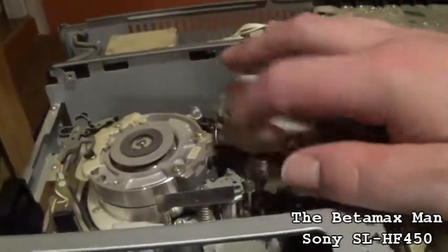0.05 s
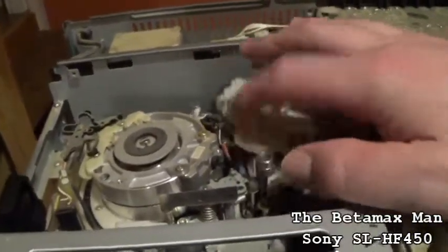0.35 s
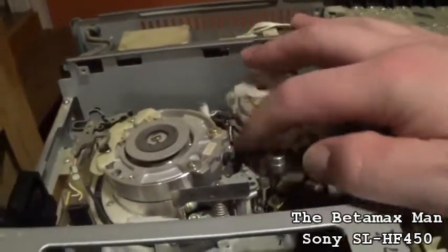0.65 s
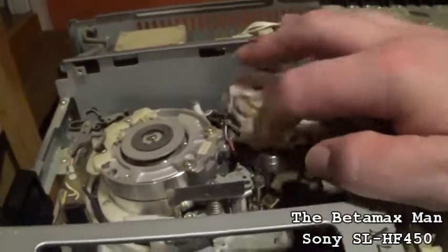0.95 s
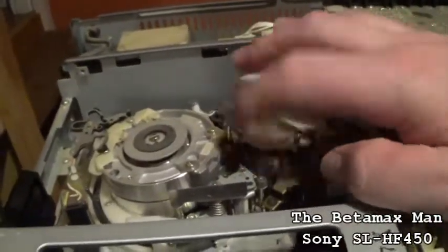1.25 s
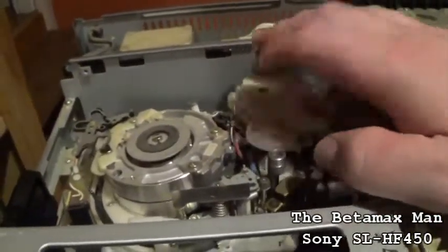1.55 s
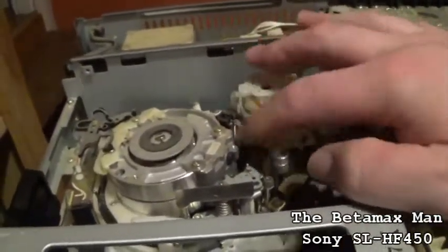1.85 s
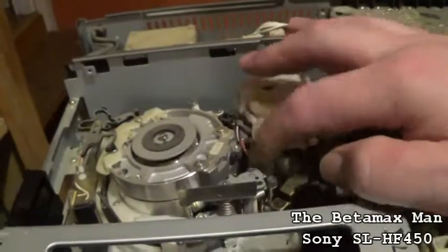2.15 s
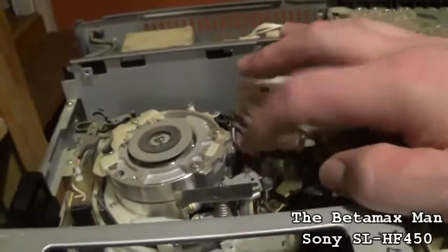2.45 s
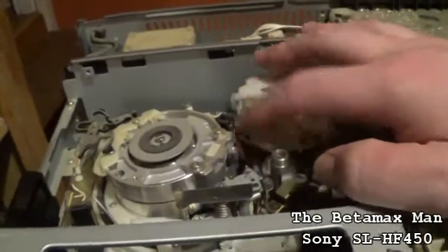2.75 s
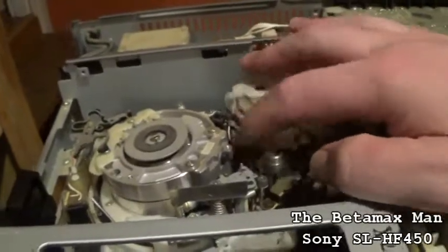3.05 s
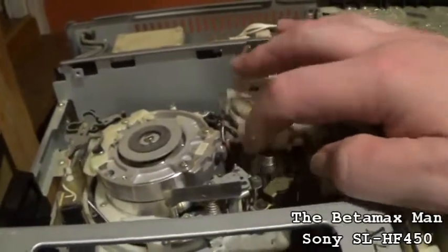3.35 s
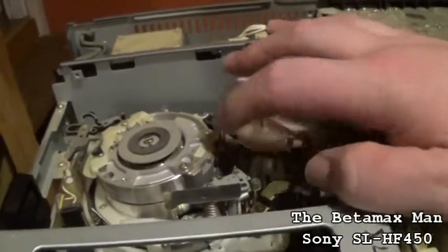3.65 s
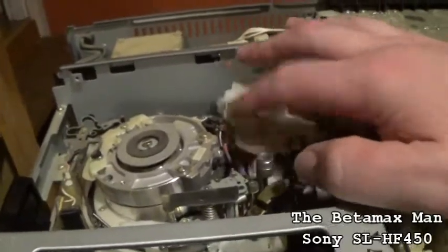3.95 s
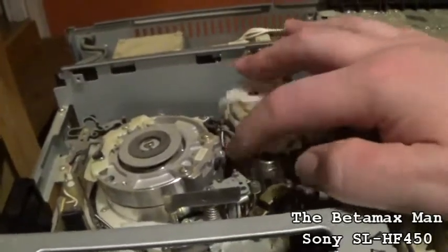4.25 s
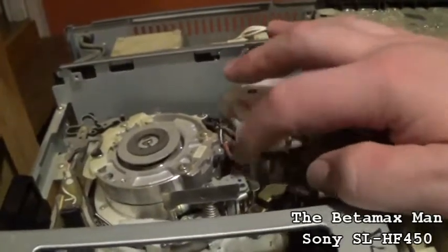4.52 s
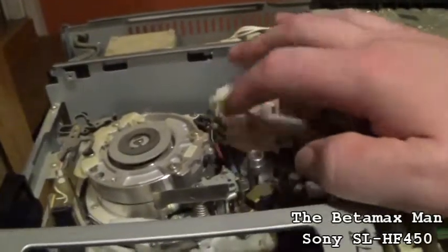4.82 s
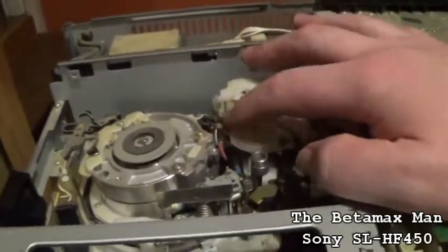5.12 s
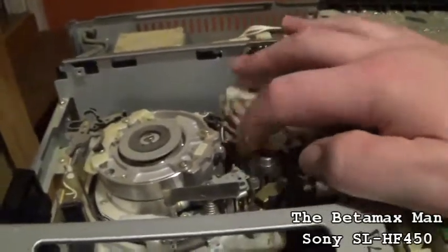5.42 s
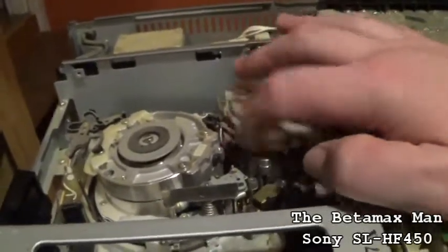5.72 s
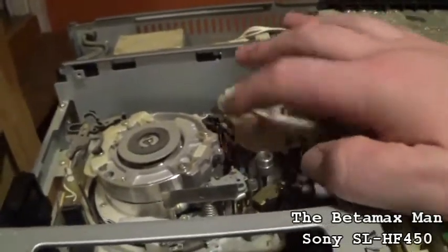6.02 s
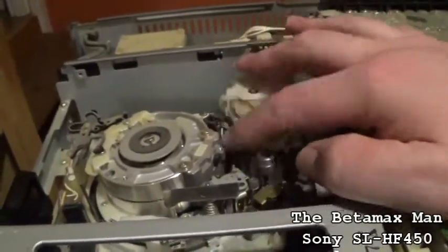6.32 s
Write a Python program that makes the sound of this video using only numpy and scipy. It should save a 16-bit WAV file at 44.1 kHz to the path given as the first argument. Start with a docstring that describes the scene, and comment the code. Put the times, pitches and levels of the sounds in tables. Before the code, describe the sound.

Close, uneven clicking and brief rasping of plastic gear teeth pushed by hand, over light ticks and dull knocks in a quiet room.

```python
"""Close microphone on an open tape machine in a small, quiet room. From the start a finger turns the
small plastic gears, push after push: the teeth drag, the hand knocks the hollow chassis, a light pawl
ticks at uneven steps, and teeth snap and rasp as each push takes hold. Just before one second a small
metal part rings on, once. Dull taps and soft thuds join in, the fingertip squeaks about halfway,
and the sharpest snap comes a little after five seconds."""
import sys
import numpy as np
from scipy import signal
from scipy.fft import rfft, irfft, next_fast_len
from scipy.io import wavfile

SR = 44100
rng = np.random.default_rng(int(sys.argv[2]) if len(sys.argv) > 2 else 0)


def generate_wav(signal):
    """Clip the signal to [-1, 1] and save it as 16-bit WAV at the path in sys.argv[1]."""
    frames = np.transpose(np.atleast_2d(signal))
    scaled = np.clip(frames, -1, 1) * 32767
    pcm = np.round(scaled).astype(np.int16)
    wavfile.write(sys.argv[1], SR, pcm)


N = 290261
TIME = np.arange(N) / SR
TOOTH_HZ = 8570  # the teeth ring near this pitch
# resonances of a plastic wheel: pitch_hz, width_hz, level_db
WHEEL_MODES = [(3100, 290, -4), (3730, 1130, -2), (4880, 1970, 1.5), (6290, 230, 0.5), (7220, 710, -2.5)]
# resonances of the frame that holds the wheels: pitch_hz, width_hz, level_db
FRAME_MODES = [(794, 780, -10), (940, 230, -4.5), (1255, 112, 4), (1664, 260, -1.5), (2170, 640, 0)]


def undb(db):
    """Decibels to gain."""
    return 10 ** (np.asarray(db) / 20)


def unit(x):
    """Scale to rms 1."""
    return x / np.sqrt(np.mean(x ** 2))


def burst(x, seconds):
    """Scale a short sound to the energy of rms 1 held for that long."""
    return x * np.sqrt(seconds * SR / np.sum(x ** 2))


def add(out, start_s, x):
    """Mix x into out from start_s on."""
    i = max(int(start_s * SR), 0)
    out[i:i + len(x)] += x[:max(N - i, 0)]


def colour(x, points):
    """Filter by a curve through points of frequency_hz, gain_db."""
    hz, db = np.transpose(points)
    size = next_fast_len(len(x) + 2048)
    bins_hz = np.maximum(np.fft.rfftfreq(size, 1 / SR), 1)
    gain = undb(np.interp(np.log(bins_hz), np.log(hz), db))
    return irfft(rfft(x, size) * gain, size)[:len(x)]


def walk(rate_hz):
    """A random value that wanders about rate_hz times a second."""
    return np.interp(TIME * rate_hz, np.arange(4096), rng.standard_normal(4096))


def contact(length_s, chatter):
    """One blow followed by a brief chatter of the two surfaces."""
    count = max(int(length_s * SR), 8)
    force = chatter * rng.standard_normal(count) * np.sqrt(np.linspace(2, 0, count) / count)
    force[0] += 1
    return force


def ring(force, modes, detune=0., scatter_db=0., rise_s=.0001, size=768):
    """Drive damped resonances that build up briefly; the point of contact shifts pitch and balance."""
    hz, width, db = np.transpose(modes)[:, :, None]
    t = np.arange(size) / SR
    shift, weight, phase = rng.standard_normal((3, len(modes), 1))
    swing = np.sin(2 * np.pi * (hz * (1 + detune * shift) * t + phase))
    partials = width * undb(db + scatter_db * weight) * np.exp(-np.pi * width * t) * swing
    return np.convolve(force, partials.sum(0) * (1 - np.exp(-t / rise_s)))


def tooth(hz):
    """The modes of a gear tooth of that pitch."""
    # tooth resonances: pitch_ratio, width_hz, level_db
    modes = [(.83, 543, -1), (0.999, 380, 11), (1.07, 453, -2.5), (1.2, 895, -1.5)]
    return [(hz * ratio, width, db) for ratio, width, db in modes]


def pressure_db(release_db=20.5, rest_db=-68):
    """Each push of the finger swells and lets go, evenly in dB; in between it rests on the wheel."""
    # pushes and lighter touches: peak_s, level_db, rise_s, fall_s (each slope spans release_db)
    pushes = [(.005, -46, .05, .08), (.385, -44, .09, .08), (0.757, -36, .055, .08), (1.01, -51, .12, .06),
              (1.175, -42, .11, .065), (1.515, -40, .11, .1), (1.595, -49, .04, 0.056), (1.79, -60, .2, .1),
              (1.932, -37, .06, .08), (2.195, -51, .09, .07), (2.308, -53, .012, .025),
              (2.376, -44, .015, .11), (2.745, -48, .03, .08), (2.8, -42, .07, .065),
              (3.175, -52, .09, .07), (3.241, -49, .04, .09), (3.55, -40, .075, .14), (3.93, -39, .06, .08),
              (4.178, -51, .015, .05), (4.365, -38, .055, .09), (4.49, -59, .08, .25),
              (4.795, -38.5, .085, .065), (5.015, -55, .06, .05), (5.168, -38.5, .05, .085),
              (5.562, -41, .085, .05), (5.655, -44, .06, .09), (5.799, -52, .07, .13),
              (5.955, -45, .08, .05), (6.062, -51, .03, .04), (6.335, -42, .06, .065),
              (6.435, -47, .06, .09)]
    power = undb(rest_db) ** 2
    for peak_s, db, rise_s, fall_s in pushes:
        away = np.maximum((peak_s - TIME) / rise_s, (TIME - peak_s) / fall_s)
        power = power + undb(db - release_db * away) ** 2
    return 10 * np.log10(power)


def moments(count, crowding):
    """Random times that crowd together where the finger presses harder."""
    chance = np.cumsum(undb(crowding * pressure_db()))
    return np.interp(rng.random(count), chance / chance[-1], TIME)


def slips(rate_hz, spread_db):
    """Stick-slip: tiny impulses at random moments, a few much larger than the rest."""
    when, size, sign = rng.random((3, N))
    strength = undb(spread_db * np.minimum(-np.log(1 - size), 4))
    return (when < rate_hz / SR) * strength * np.sign(sign - .5)


def room_tone(level_db=-59.5, side_db=-14, hum_hz=59.6, hum_db=-73, waver_db=3.0):
    """Steady room noise, nearly the same on both sides, with a faint hum that wavers."""
    # spectrum of the quiet room: frequency_hz, gain_db
    spectrum = [(20, -4), (60, 2), (130, 6), (280, 7.5), (500, 1), (1000, -14), (2000, -12), (4000, -8.5),
                (8500, -13.5), (11000, -35)]
    mid = unit(colour(rng.standard_normal(N), spectrum))
    side = colour(rng.standard_normal(N), spectrum)
    side = unit(colour(side, [(250, -26), (600, -18)]))
    hum = undb(hum_db + waver_db * walk(4.6)) * unit(np.sin(2 * np.pi * hum_hz * TIME))
    return undb(level_db) * (mid + undb(side_db) * side * np.array([[1], [-1]])) + hum


def drag(flutter_db=2.9, shimmer_db=3, ring_db=-5, ring_q=14, hiss_db=-0.5):
    """Plastic slides in dense slips that hiss, rumble in the frame and keep the teeth faintly ringing."""
    # friction hiss at the teeth: frequency_hz, gain_db
    hiss_spectrum = [(1800, -28), (2900, -4.5), (4000, 1), (4700, 0), (5900, -1.5), (6500, -2), (7100, 7),
                     (7700, -2), (8600, -1), (9200, -4), (9800, 0.5), (11000, -3)]
    # friction carried through the frame: frequency_hz, gain_db
    frame_spectrum = [(50, -14.5), (140, 2), (350, 0), (650, -3.5), (900, -1), (1350, -6), (1800, -6),
                      (2400, -8.5), (3000, -15), (4500, -56)]
    # rings that sliding keeps alive: pitch_hz, level_db
    slide_rings = [(3900, -10), (5600, -5), (8500, 1.5), (9050, -1)]
    pressure = pressure_db()
    friction = slips(rate_hz=9000, spread_db=3.6) * undb(flutter_db * walk(110))
    teeth = unit(colour(friction, hiss_spectrum))
    for hz, db in slide_rings:
        band = signal.lfilter(*signal.iirpeak(hz, ring_q, SR), friction)
        # each ring comes and goes as the contact moves round the wheel
        teeth = teeth + undb(ring_db + db) * unit(band * walk(30) * undb(shimmer_db * walk(10)))
    frame = unit(colour(friction, frame_spectrum))
    # the frame answers more evenly than the teeth; a normal push is -41.5 dB
    frame_db = -47 + 0.55 * (pressure + 41.5)
    return unit(teeth) * undb(pressure + hiss_db) + frame * undb(frame_db)


def knocks(rap_gain_db=1.0, clatter_db=-8, clatter_t60_s=0.1):
    """The hollow chassis booms under a soft bump and raps under a harder one; loose parts clatter."""
    # bumps on the chassis: start_s, boom_db, rap_db
    bumps = [(0.037, -43, -43.5), (.13, -50, -66), (.284, -41, -54), (1.012, -52.5, -56), (1.467, -45, -68),
             (2.134, -58, -51), (2.204, -48.5, -52.5), (2.48, -51, -57), (3.388, -55.5, -59),
             (3.867, -38, -52.5), (3.965, -51, -62), (4.565, -53, -50), (5.083, -37, -51),
             (5.266, -49.5, -55), (5.583, -33, -41.5), (5.792, -54, -50), (6.11, -50.5, -46.5),
             (6.207, -49, -55), (6.331, -34.5, -52), (6.353, -50, -55)]
    # low chassis resonances: pitch_hz, width_hz, level_db
    boom_modes = [(143, 40, -4.5), (254.5, 26, -9.5), (358.7, 16.4, 5.5), (421, 25, -2.5), (573, 26, -8.5)]
    # higher chassis resonances: pitch_hz, width_hz, level_db
    rap_modes = [(600, 32, -6.5), (820, 59, 3.5), (870, 64, 7.5), (1215, 41, -6.5), (1392, 36, -9),
                 (1800, 90, -11)]
    out, t = np.zeros(N), TIME[:SR // 6]
    envelope = undb(-60 * t / clatter_t60_s) * np.minimum(t / 0.00092, 1)
    for start_s, boom_db, rap_db in bumps:
        for modes, db in (boom_modes, boom_db), (rap_modes, rap_db + rap_gain_db):
            force = contact(0.0038, chatter=0.24)
            chassis = ring(force, modes, detune=0.025, scatter_db=0.5, rise_s=0.002, size=6144)
            low, high = modes[0][0], modes[-1][0]
            band = [(low / 2, -20), (low, 0), (high, 0), (2 * high, -22), (4 * high, -50)]
            clatter = colour(rng.standard_normal(len(t)), band) * envelope
            add(out, start_s, burst(chassis, 0.013) * undb(db))
            add(out, start_s, burst(clatter, 0.014) * undb(db + clatter_db))
    return out


def pawl(level_db=-53, spread_db=0.85, bounce_s=.0019, bounce=0.91, click_db=-10):
    """A sprung pawl drops with a light tick and a quick bounce; the wheel under it gives a dull click."""
    # drops that stand clear in the lulls: start_s
    drops = [.057, .096, .212, .328, .511, 0.884, .973, 1.023, 1.267, 1.33, 1.402, 1.428, 1.655, 1.738,
             1.759, 2.077, 2.156, 2.302, 2.545, 2.925, 3.015, 3.146, 3.263, 3.384, 3.419, 3.680, 3.802,
             3.874, 4.059, 4.106, 4.327, 4.506, 4.618, 4.749, 4.886, 5.011, 5.088, 5.125, 5.289, 5.377,
             5.413, 5.648, 5.685, 5.754, 5.812, 5.841, 6.054, 6.181, 6.202, 6.221, 6.250, 6.377, 6.398,
             6.572]
    # pawl resonances: pitch_hz, width_hz, level_db
    modes = [(2112, 62, -1), (2230, 150, -13), (3340, 69, -16.5), (4140, 130, -20), (5970, 330, -12),
             (6300, 61, -12), (7300, 220, -20.5), (7940, 240, -16), (8500, 220, -19), (9100, 200, -26),
             (10020, 110, -18)]
    out = np.zeros(N)
    for start_s in np.concatenate([drops, moments(count=10, crowding=1.3)]):
        db = level_db + spread_db * rng.standard_normal()
        for delay_s, share in (0, 1), (bounce_s * rng.uniform(0.695, 1.3), bounce):
            tick = ring(contact(0.0011, chatter=0.45), modes, detune=0.013, scatter_db=0.2, size=1024)
            click = ring(contact(0.0013, chatter=1.1), WHEEL_MODES + FRAME_MODES, detune=0.064)
            add(out, start_s + delay_s, share * burst(tick, 0.011) * undb(db))
            add(out, start_s + delay_s, share * burst(click, 0.0064) * undb(db + click_db))
    return out


def catches(count=110, crowding=1.1, level_db=-46, spread_db=3):
    """Teeth catch lightly and crackle at random, mostly while the finger pushes."""
    out, modes = np.zeros(N), WHEEL_MODES + tooth(TOOTH_HZ)
    for start_s, size in zip(moments(count, crowding), rng.standard_normal(count)):
        click = ring(contact(0.0015, chatter=1.7), modes, detune=0.056, scatter_db=2.5)
        add(out, start_s, burst(click, 0.002) * undb(level_db + spread_db * min(size, 2)))
    return out


def backlash(count=65, level_db=-56, spread_db=3):
    """Loose wheels tick faintly against each other at any moment."""
    out, modes = np.zeros(N), WHEEL_MODES + tooth(hz=8700)
    for start_s, size in zip(rng.uniform(0, N / SR, count), rng.standard_normal(count)):
        tick = ring(contact(0.0013, chatter=0.31), modes, detune=0.1, scatter_db=-5)
        add(out, start_s, burst(tick, 0.0028) * undb(level_db + spread_db * min(size, 2)))
    return out


def snaps(tooth_scatter=0.013, lead_width_hz=340, lead_db=6, frame_gain_db=-1):
    """A tooth springs free and rings high, one mode of its wheel leads the crack, the frame clacks."""
    # the loudest teeth snapping free: start_s, tooth_db, wheel_db, lead_hz, frame_db
    releases = [(.246, -49.5, -35, 3570, -43), (0.2572, -41, -49, 4030, -50),
                (.3593, -50, -36.5, 4530, -62), (0.3672, -31.5, -46, 4130, -53),
                (0.407, -37, -37, 6870, -45), (0.6474, -43.5, -54, 7300, -56),
                (0.7493, -31, -38, 7000, -59), (.757, -33, -37, 3200, -50),
                (0.8672, -70, -39.5, 3000, -42.5), (1.1589, -32, -33, 2960, -48),
                (1.1625, -31, -36, 6900, -53), (1.1796, -26.5, -30.5, 6215, -41),
                (1.251, -31.5, -35, 4860, -67), (1.407, -45, -39.5, 7040, -44),
                (1.4547, -54, -39.5, 3840, -45), (1.501, -33, -36, 6050, -49),
                (1.582, -29, -34.5, 5040, -49), (1.9332, -35, -33, 6940, -54),
                (2.3868, -34.5, -40, 7060, -61), (2.4421, -36, -47, 5070, -69),
                (2.7906, -33, -35.5, 5600, -40), (2.8025, -27, -44, 3870, -47),
                (3.0312, -38.5, -44, 6908, -46.5), (3.09, -47, -43, 5424, -48),
                (3.1743, -35.5, -51, 6014, -48), (3.247, -38, -34.5, 5750, -68),
                (3.454, -58, -45, 3100, -44), (3.4643, -35, -52, 7160, -65), (3.489, -57, -44, 3001, -41),
                (3.549, -27, -27.5, 5440, -38), (3.8359, -38.5, -45, 6147, -43.5),
                (4.005, -38.5, -36.5, 6760, -49), (4.012, -47, -38.5, 5000, -46),
                (4.0474, -48, -37.5, 2880, -39), (4.1735, -66, -34.5, 3603, -58),
                (4.3659, -23.5, -36, 7118, -39.5), (4.411, -39, -40.5, 6204, -62),
                (4.6672, -42, -43.5, 4543, -45), (4.7926, -31, -30, 6242, -42),
                (4.7981, -23, -26, 7005, -40), (4.8224, -35, -31.5, 6910, -55),
                (5.026, -35, -45, 6720, -70), (5.138, -59, -38.5, 4534, -56), (5.15, -47, -37.5, 5480, -64),
                (5.166, -26, -41, 5506, -38), (5.1717, -17.5, -38, 6960, -42),
                (5.4508, -42.5, -50, 4650, -54), (5.4905, -58, -40.5, 3070, -43),
                (5.547, -27.5, -42, 6815, -59), (5.5681, -38, -36, 4903, -39),
                (5.6734, -46, -41.5, 5070, -53), (5.8584, -33, -35, 4288, -44.5),
                (5.953, -33, -42, 7045, -41), (6.258, -38, -48, 4105, -52), (6.33, -33.5, -50, 4106, -50),
                (6.349, -53, -34, 3980, -53), (6.4898, -48, -32, 3270, -40)]
    out = np.zeros(N)
    for start_s, tooth_db, wheel_db, lead_hz, frame_db in releases:
        force = contact(0.00227, chatter=1.46)
        tip = tooth(TOOTH_HZ * (1 + tooth_scatter * rng.standard_normal()))
        wheel = WHEEL_MODES + [(lead_hz, lead_width_hz, lead_db)]
        for modes, db in (tip, tooth_db), (wheel, wheel_db), (FRAME_MODES, frame_db + frame_gain_db):
            part = ring(force, modes, detune=0.014, scatter_db=1.5, rise_s=0.00022)
            add(out, start_s, burst(part, 0.0022) * undb(db))
    return out


def rasps(teeth_per_s=230, slip_s=.0035, spread_db=2.5, frame_gain_db=-1):
    """A push gives way: several teeth skip past each other in a swelling run, each with its own ring."""
    # bell-shaped runs of slipping teeth: middle_s, half_width_s, teeth_db, frame_db
    runs = [(.377, .016, -40, -44.5), (0.762, 0.013, -35, -40), (1.003, 0.0091, -49, -48),
            (1.187, 0.0084, -40, -46), (1.503, 0.0074, -34, -46), (1.517, 0.0048, -38, -39.5),
            (1.583, 0.0078, -39, -49), (1.915, .005, -39.5, -42), (1.945, 0.013, -40.5, -48.5),
            (2.174, .013, -53.5, -50), (2.202, 0.0085, -48.5, -49.5), (2.372, 0.0046, -35, -45.5),
            (2.796, .011, -40, -41.5), (3.172, .008, -47, -53), (3.381, .0064, -46, -50),
            (3.552, .005, -34.5, -40.5), (3.917, .004, -33, -41), (3.934, 0.0072, -32, -41.5),
            (4.173, .005, -53.5, -42.5), (4.356, .01, -38, -45.5), (4.775, 0.0051, -38.5, -39),
            (4.794, .008, -32.5, -38), (5.169, 0.0068, -34, -41.5), (5.559, 0.0077, -33, -39),
            (5.953, 0.0075, -41, -50.5), (6.333, 0.0041, -43, -45), (6.353, 0.0052, -44, -40),
            (6.437, 0.0081, -46, -53)]
    out = np.zeros(N)
    for middle_s, half_width_s, teeth_db, frame_db in runs:
        reach_s = 2 * half_width_s
        teeth, frame = np.zeros((2, SR // 4))
        for offset_s in np.arange(-reach_s, reach_s, 1 / teeth_per_s):
            swell = np.exp(-.5 * (offset_s / half_width_s) ** 2)
            force = contact(slip_s, chatter=2.4) * swell * undb(spread_db * rng.standard_normal())
            at_s = offset_s + reach_s + rng.uniform(0, .5) / teeth_per_s
            add(teeth, at_s, ring(force, WHEEL_MODES + tooth(TOOTH_HZ), detune=0.06, scatter_db=4))
            add(frame, at_s, ring(force, FRAME_MODES, detune=0.064, scatter_db=1.5))
        start_s = middle_s - reach_s - slip_s / 2
        add(out, start_s, burst(teeth, reach_s) * undb(teeth_db))
        add(out, start_s, burst(frame, reach_s) * undb(frame_db + frame_gain_db))
    return out


def ping(start_s=.778, level_db=-48):
    """A small metal part is set ringing; a close pair of modes beats as it dies away."""
    # modes of the metal part: pitch_hz, t60_s, level_db
    modes = [(4480, 0.58, -1.5), (4520, 0.6, -.5), (6384, 0.6, -13), (6500, 0.69, -8), (6900, 0.37, -14),
             (10770, 0.49, -4)]
    out, t = np.zeros(N), TIME[:SR]
    metal = sum(undb(db - 60 * t / t60_s) * np.sin(2 * np.pi * hz * t) for hz, t60_s, db in modes)
    add(out, start_s, undb(level_db) * metal)
    return out


def taps():
    """Damped by the finger, these blows hardly ring."""
    # dull, dry taps: start_s, level_db
    blows = [(1.1195, -41.5), (2.0977, -42.5), (3.254, -49), (3.392, -46.5), (3.5042, -47), (3.671, -45.5),
             (3.8167, -42.5), (4.0483, -40), (4.2895, -54), (6.1473, -56)]
    out = np.zeros(N)
    for start_s, db in blows:
        tap = ring(contact(0.00047, chatter=0.46), [(520, 520, 0), (1080, 560, -2.2)], detune=0.038)
        dulled = colour(tap, [(1900, 4), (3500, -20)])
        add(out, start_s, burst(dulled, 0.0036) * undb(db))
    return out


def thuds(damping=0.23):
    """Under the hand, the heavy body rocks for a few cycles on its feet."""
    # soft thuds of the body: start_s, pitch_hz, level_db
    nudges = [(1.736, 110, -52), (2.378, 152.4, -51), (3.396, 148.8, -50), (3.955, 150, -49),
              (4.48, 47.5, -56.5), (4.99, 131, -53), (5.176, 124, -53), (5.606, 91, -54.5),
              (5.792, 156, -50), (6.353, 128, -46.5)]
    out = np.zeros(N)
    for start_s, hz, db in nudges:
        rocking = ring([1.], [(hz, damping * hz, 0)], rise_s=1 / hz, size=8192)
        add(out, start_s, burst(rocking, 3 / hz) * undb(db))
    return out


def squeak(start_s=3.166, length_s=.036, pitch_hz=1390, level_db=-51, waver=.07):
    """The fingertip's slips on the plastic fall into step and give a short, unsteady tone."""
    out, count = np.zeros(N), int(length_s * SR)
    hz = pitch_hz * (1 + waver * walk(400)[:count])
    tone = np.hanning(count) * np.sin(2 * np.pi * np.cumsum(hz) / SR)
    add(out, start_s, burst(tone, length_s / 2) * undb(level_db))
    return out


def room(x, casing_db=-13, casing_t60_s=0.044, walls_db=-14, walls_t60_s=0.24):
    """Quick echoes from the casing reach the microphone first, then a short, duller tail off the walls."""
    t = TIME[:SR // 2]
    casing, walls = rng.standard_normal((2, len(t)))
    casing = casing * undb(-60 * t / casing_t60_s) * (t > .001)
    walls = colour(walls, [(200, 18.0), (3000, 0.5), (10000, 3)])
    walls = walls * undb(-60 * t / walls_t60_s) * (t > .007)
    echoes = undb(casing_db) * casing / np.linalg.norm(casing)
    echoes += undb(walls_db) * walls / np.linalg.norm(walls)
    echoes = colour(echoes, [(330, -12.5), (520, 0.5), (4000, 6.5), (8500, 0)])
    return signal.fftconvolve(x, echoes)[:N]


def place(x, pan_db):
    """Direct sound plus separate echoes on each side of the microphone; pan_db is left minus right."""
    return np.array([(x + room(x)) * undb(side * pan_db / 2) for side in (1, -1)])


def scene():
    """The machine sits close to the stereo microphone, almost straight ahead, over the room tone."""
    gears = drag() + rasps() + snaps() + catches() + backlash() + pawl()
    machine = gears + knocks() + thuds() + taps() + squeak() + ping()
    return place(machine, pan_db=-0.4) + room_tone()


def record(dry):
    """The recorder cuts the treble steeply above 11.1 kHz."""
    return signal.sosfilt(signal.ellip(10, .2, 70, 11100, fs=SR, output="sos"), dry)


dry = scene()
out = record(dry)
generate_wav(out)
```